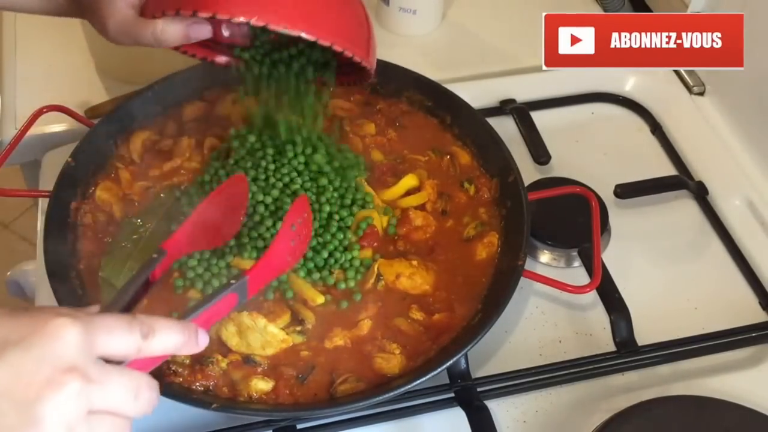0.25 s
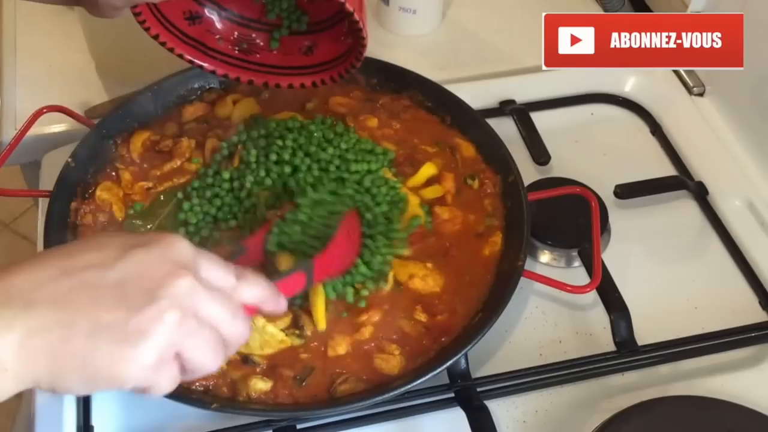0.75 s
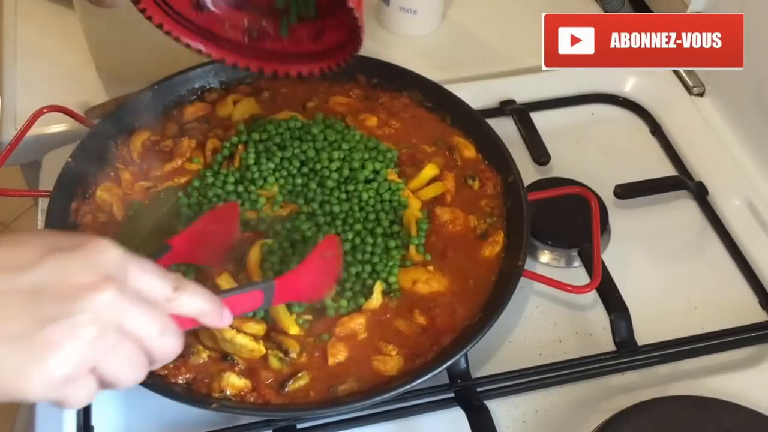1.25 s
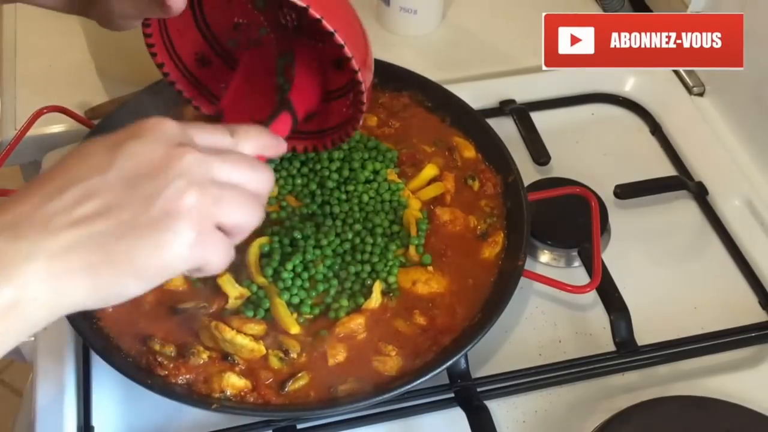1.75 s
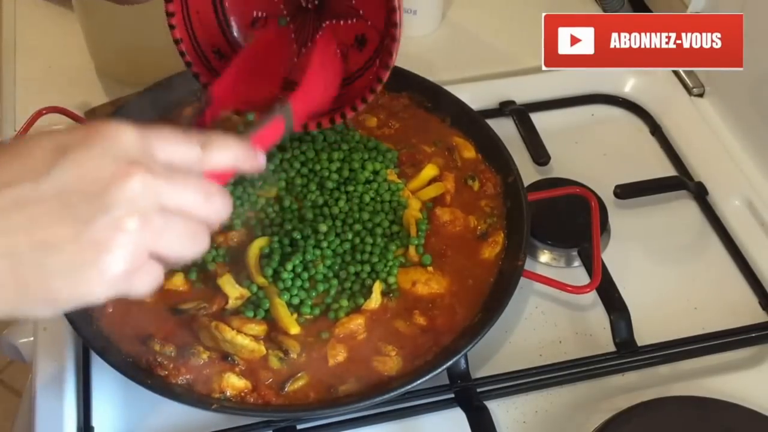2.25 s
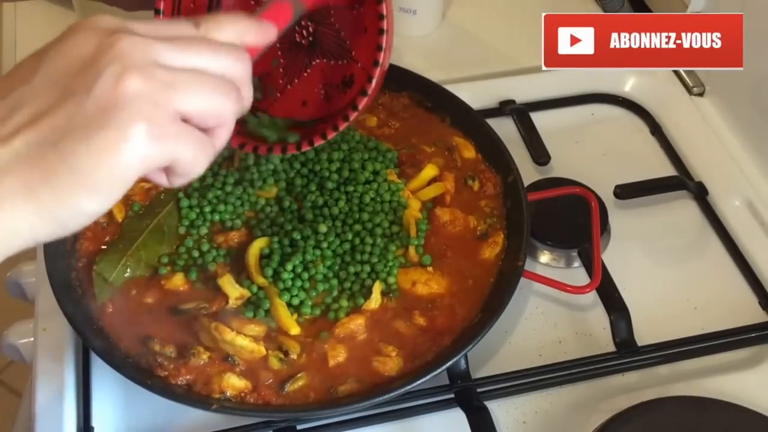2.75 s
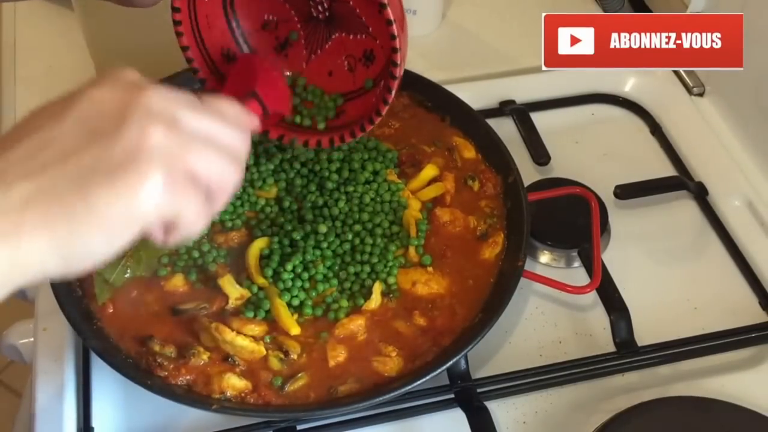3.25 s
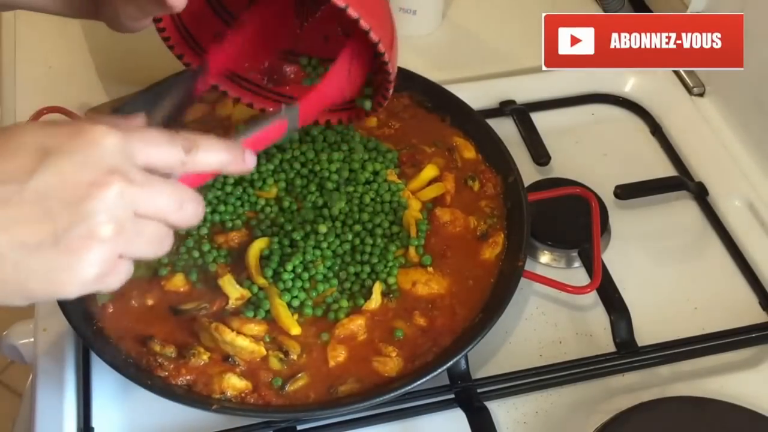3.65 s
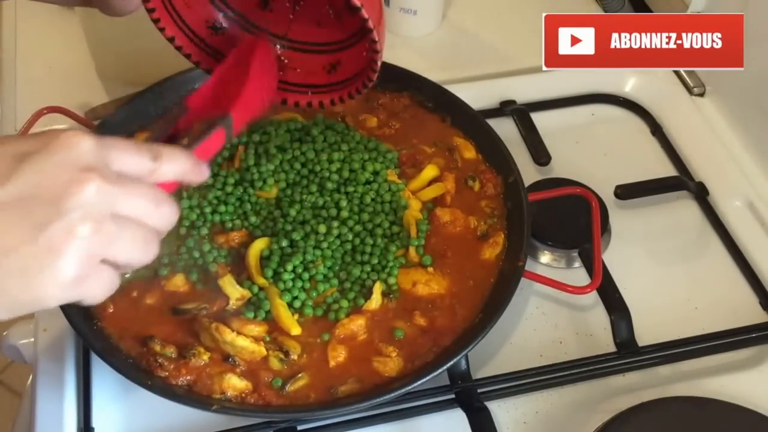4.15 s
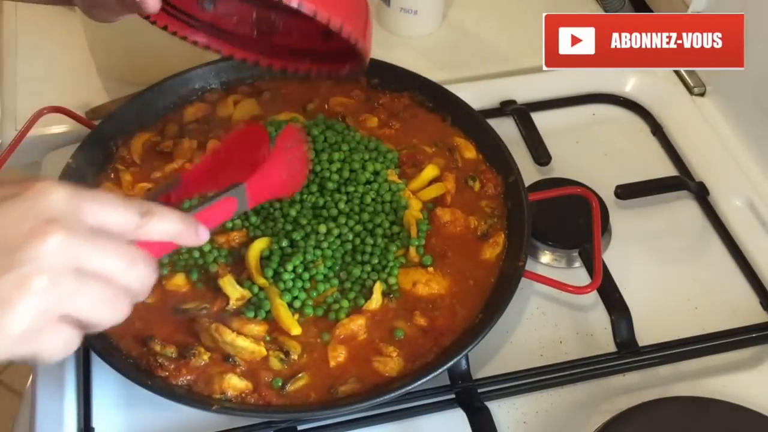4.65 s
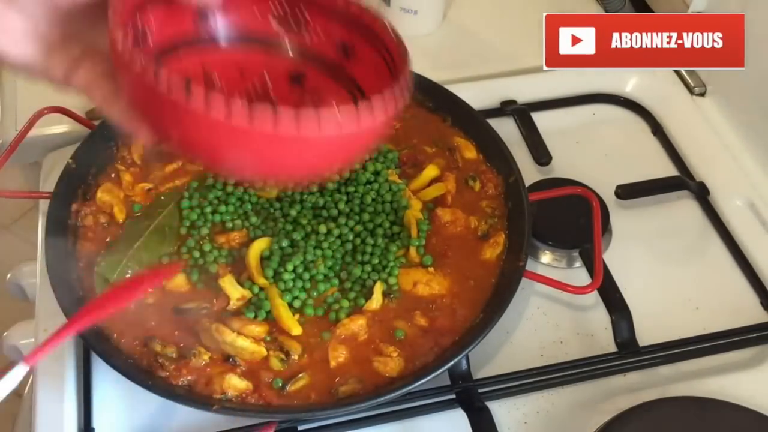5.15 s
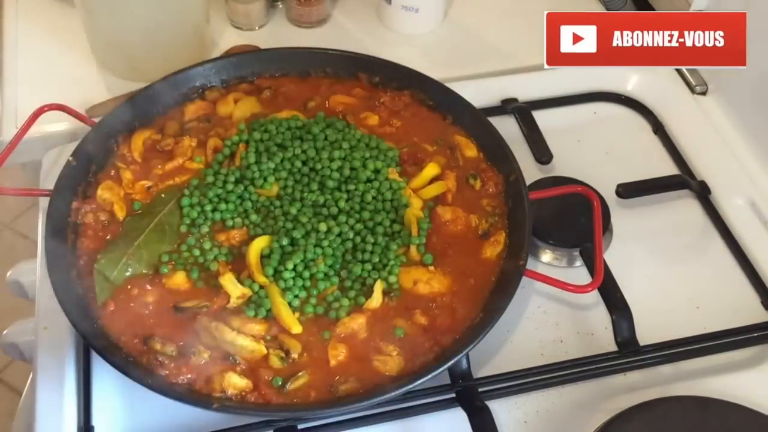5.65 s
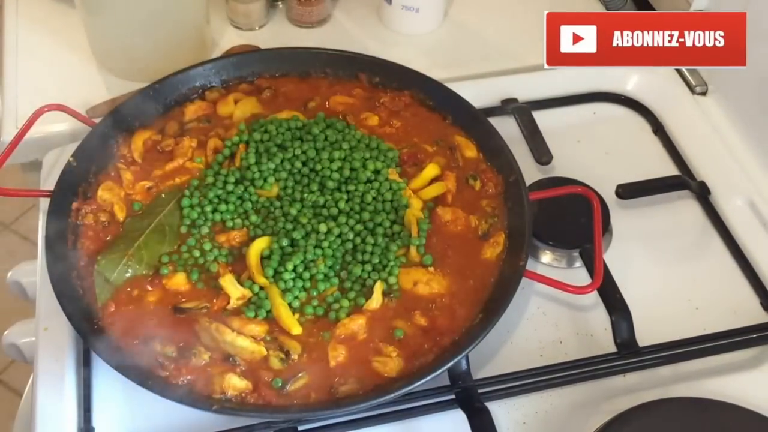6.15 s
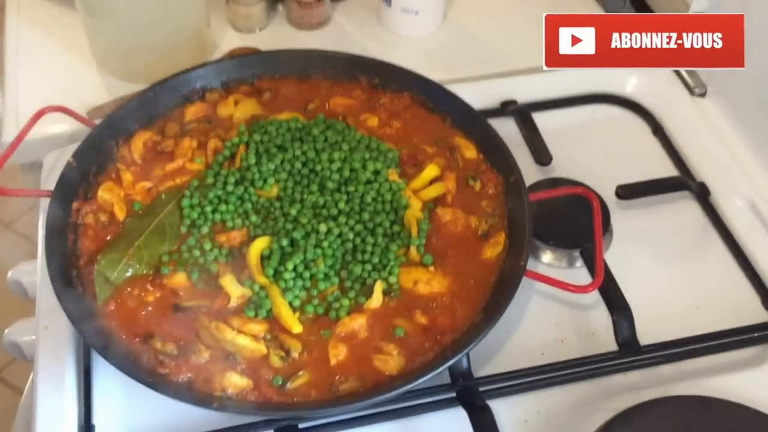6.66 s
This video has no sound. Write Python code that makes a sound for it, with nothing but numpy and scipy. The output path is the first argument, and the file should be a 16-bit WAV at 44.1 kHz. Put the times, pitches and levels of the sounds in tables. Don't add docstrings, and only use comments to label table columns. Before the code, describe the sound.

A steady low simmer, fine crackle, gas hiss and faint extractor hum lie beneath sharp bowl knocks. A first crack, a duller pair, soft thuds, then a cluster of loud short rings; afterwards only dry ticks and snaps of tongs scraping out peas. Finally the bowl is set down in two hollow, woody blows with small rattles. Close mono phone pickup, brief tiled-room reflections.

```python
import sys
import numpy as np
from scipy import signal
from scipy.fft import rfft, irfft
from scipy.io import wavfile
from scipy.ndimage import uniform_filter1d, map_coordinates

SR = 44100
rng = np.random.default_rng(int(sys.argv[2]) if len(sys.argv) > 2 else 0)


def invert_db(x):
    u = np.asarray(x, float) / 20
    return 10 ** u


def put_to_file(sound):
    columns = np.atleast_2d(sound).T
    safe = np.clip(columns, -1, 1)
    whole_steps = np.round(safe * 32767)
    wavfile.write(sys.argv[1], SR, whole_steps.astype(np.int16))


N = 305172

# start in seconds, crack, thump, body and ring levels in dB.
BLOWS = [
    (0.3364, 1.5, -16.5, -12.5, -16),
    (0.6653, -40, -19, -21.5, -19),
    (0.724, -7, -17, -6.5, -18),
    (1.411, -29, -20, -24, -18),
    (1.8247, -21, -22, -25, -10),
    (2.107, 2, -39, -16.5, -10.5),
    (2.345, 5, -8.5, -2, -3),
    (2.6986, -5, -18.5, -11, -13),
    (6.4365, -7, -34, -11, -8),
    (6.6323, -6, -16, -2, -12.5),
]
# frequency in Hz, level in dB, t60 in seconds.
TIPPING_RINGS = [
    [(518, -7.5, 0.2), (1164, -15, 0.22), (1417, -11, 0.24), (1525, -13, 0.18), (2180, -26, 0.13),
     (3180, -5, 0.16), (3560, -7, 0.15), (3670, -6, 0.15), (4484, -6, 0.18)],
    [(129, -0.5, 0.18), (320, 8, 0.12), (392, -3, 0.12), (800, 0.5, 0.083), (1400, -8, 0.06)],
    [(130.4, -4.5, 0.24), (178.5, -1, 0.27), (334.5, -11, 0.3), (744, -14, 0.18), (900, -16, 0.3),
     (1098, -0.5, 0.31), (1240, 1, 0.16), (1440, -6, 0.2), (1530, -5, 0.1), (1940, -13, 0.12)],
    [(147, 3.5, 0.17), (278, 2, 0.092), (336, 2, 0.1), (771, -2, 0.06), (1446, -14, 0.1)],
    [(187, -6, 0.24), (236, 0.5, 0.099), (528, -20, 0.09), (1175, -18.5, 0.067), (1490, -23, 0.12)],
]
SCRAPING_RINGS = [
    [(175.7, -14.5, 0.4), (279, -10, 0.34), (900, -10, 0.13), (1136, -12, 0.26), (1384, -8, 0.099),
     (1755, -8.5, 0.17), (2000, -14.5, 0.2), (2200, -13, 0.15)],
    [(175.6, -1.5, 0.23), (246, -7, 0.16), (328, -3, 0.11), (557, -14, 0.27), (622, -14, 0.092),
     (760, -8.5, 0.16), (1130, -7, 0.11), (1392, -6.5, 0.22), (1470, -13, 0.2), (1974, -5, 0.095),
     (2174, -17, 0.18)],
    [(277, -5, 0.091), (527, -14, 0.28), (599, -13, 0.11), (730, -1, 0.067), (926, -10, 0.14),
     (1130, -9.5, 0.2), (1392, -9.5, 0.14), (1720, -19, 0.13), (4300, -8, .03), (3080, -16, 0.053)],
]
WORKTOP_RINGS = [
    [(119, -28, 0.28), (149, 7, 0.12), (216.4, -1.5, 0.29), (321, 5, 0.12), (691, -9.5, 0.22),
     (839, 2.5, 0.09), (980, 1, 0.059), (1460, -26, 0.17), (1960, -13, 0.15), (2350, -19, 0.2),
     (3080, -13, 0.075)],
    [(249, 4, 0.24), (284, 0.5, 0.18), (613, -1.5, 0.41), (780, -6, 0.11), (950, -6, 0.24),
     (1200, -6, 0.27), (1497, -9, 0.19), (1670, -4, 0.19), (1970, -6, 0.15), (2667, -2.5, 0.067),
     (3320, -13, .07)],
]
BOWL_MODES_HZ = [2600, 2947, 3008, 3348, 3806, 4554, 4850, 5960, 6845, 7510, 8834, 9255, 10040, 11860]
BOWL_T60_S = [0.19, 0.27, 0.19, 0.098, 0.27, 0.17, 0.046, 0.17, 0.14, 0.085, 0.1, 0.14, 0.14, 0.1]
BOWL_WOKEN_DB = {0: [-27, -6.5, -4, -7, -19, -13, -15, -11, -22, -10, -30, -19, -29, -25], 2: [-18, -15.5,
                 -11, -30, -36, -32, -7.5, -26, -29, -14, -38, -32, -22, -42], 5: [-22, -15, -10, -24, -16,
                 -10.5, -9, -11, -16, -12, -11.5, -25, -28, -21], 6: [-12.5, -20, -10, -11.5, -14, -12.5,
                 -2.5, -19, -24, -23, -39, -29, -27, -26]}
# start in seconds, crack, thump and body levels in dB.
REBOUNDS = [(1.4535, -46, -26, -49), (1.4726, -45, -27, -33), (1.86, -40, -28, -28.5),
            (1.8903, -18, -42, -39), (2.3621, -14, -17, -8), (4.5055, -34, -55, -30.5),
            (5.1034, -12, -30, -27.5), (5.369, -40, -21.5, -30), (5.3844, -44, -40, -27),
            (5.4895, -36, -30.5, -26.5), (5.6432, -34, -33, -27.5), (6.2056, -44, -31, -33),
            (5.555, -48, -26, -44), (6.2306, -42, -35, -26.5), (6.262, -45, -35, -35),
            (6.4486, -12.5, -14, -6), (6.4948, -20, -12.5, -22), (6.654, -19, -8.5, -3.5),
            (6.685, -30, -10.5, -13), (6.734, -31, -15.5, -21)]
# frequency in Hz, level in dB per Hz.
CRACK_SPECTRUM = [(1060, -11), (1800, -9), (3020, -3.5), (4220, -7), (4720, -11), (5270, -7.5),
                  (14800, -33.5), (16500, -59)]
THUMP_SPECTRUM = [(30, -40), (70, -89), (120, -1.5), (320, -2), (520, -12), (900, -12)]
BODY_SPECTRUM = [(300, -74), (550, 3), (900, 1), (1500, -3), (2200, -9.5), (3500, -30)]
SNAP_SPECTRUM = [(500, -47), (1200, -5.5), (3000, 7), (7000, -2), (12000, -11), (15800, -15), (16700, -36)]
# frequency in Hz, t60 in seconds.
WALLS_T60_S = [(100, 0.22), (500, 0.32), (2000, 0.4), (6000, 0.29), (14000, 0.17)]

# start in seconds, peak in dB,
# frequency in Hz, t60 in seconds.
RAPS = [(0.3359, -1, 3390, 0.024), (0.3363, -1.5, 3000, 0.007), (.344, -16, 3450, .09),
        (.7245, -12, 1200, 0.03), (1.413, -9.5, 310, 0.049), (1.451, -11, 290, 0.04),
        (1.8242, -20, 221, 0.06), (0.3366, -5, 4580, 0.027), (.359, -19, 4580, .04), (.358, -22, 5850, .05),
        (.381, -14, 3000, 0.26), (1.4735, -19, 750, 0.027), (2.1077, -6.5, 4670, 0.035),
        (2.1075, -14, 3790, 0.064), (2.1085, -12.5, 6040, 0.05), (2.343, -2, 3000, 0.084),
        (2.6995, -6.5, 760, 0.032), (2.699, -11, 5550, .016), (2.708, -20, 1400, 0.036),
        (5.369, -23, 430, 0.049), (5.485, -26, 1470, .06), (5.643, -30, 2520, 0.036),
        (6.4366, -4, 1905, 0.022), (6.4372, -7.5, 2310, 0.021), (6.4916, -1, 190, 0.05),
        (6.446, -7, 927, 0.064), (6.579, -36, 6200, .015), (6.634, -7, 900, 0.04), (6.657, -3, 290, 0.09),
        (6.684, -6.5, 595, 0.037), (6.698, -14, 1700, .04),
        (.6665, -10, 330, .099), (2.9462, -19, 5600, 0.0044), (3.3106, -10.5, 5000, 0.0024),
          (3.589, -26, 2900, 0.014), (3.861, -27, 1800, .01), (4.024, -33, 6500, .008),
          (4.052, -41, 6040, .008), (4.1262, -10.5, 5980, 0.0038), (4.24, -32, 5500, .008),
          (4.2538, -12, 4000, 0.0038), (4.342, -33, 5000, .01), (4.366, -30, 6500, .008),
          (4.4752, -16, 4600, 0.0027), (4.476, -20, 1050, 0.018), (4.512, -22, 2400, .02),
          (5.644, -26, 800, 0.037), (6.446, -2, 168.7, 0.078), (6.532, -20, 800, 0.037),
          (6.712, -20, 302, 0.068), (6.726, -15, 610, 0.029), (6.748, -24, 1200, .03),
          (6.763, -18, 800, 0.038), (6.793, -28, 1800, .03)]
# start in seconds, peak in dB, frequency in Hz, t60 in seconds.
LINGERS = [(.345, -31, 4570, 0.56), (.41, -23.5, 2990, 0.25), (.728, -20.5, 1926, 0.25),
           (.728, -37, 7520, 0.18), (.745, -33, 4830, 0.15), (2.11, -31, 5950, 0.41),
           (2.176, -29.5, 4550, 0.21), (2.24, -39, 3780, .2), (2.11, -35, 7440, .3),
           (2.351, -32, 3807, 0.36), (2.4, -29, 3005, 0.3), (2.41, -38, 7500, 0.22)]
# start in seconds, peak in dB, t60 in seconds.
SPRAYS = [
    (.357, -29, .1),
    (2.712, -35, .15),
    (6.438, -21, 0.19),
    (6.633, -24.5, 0.3),
]
# frequency in Hz, level in dB per Hz.
SPRAY_SPECTRUM = [(1200, -30), (2000, 4), (4200, -2.5), (6000, -7), (9000, -22), (14000, -40)]

# start in seconds, peak in dB, frequency in Hz,
# t60 in seconds.
HOPS = [(.2215, -31, 2900, .015), (.683, -13, 330, .06), (.705, -17, 300, .04), (.713, -30, 3000, .03),
        (.737, -6.5, 1150, 0.017), (.762, -18, 1200, .03), (.784, -16, 1120, .03), (.868, -29, 3180, .03),
        (1.434, -14.5, 320, 0.073), (1.474, -28, 1290, 0.018), (1.492, -24, 304, .06),
        (1.524, -27, 220, .05), (1.838, -30, 1250, .03), (1.85, -18, 261, .07), (1.888, -24, 207, 0.066),
        (2.362, 1, 1366, .04), (2.386, -18, 990, .04), (2.415, -25, 700, 0.036), (4.047, -31, 715, .03),
        (5.1045, -26, 2390, 0.073), (5.115, -33, 2170, .08), (5.261, -35, 1340, .03),
        (5.58, -30, 1370, .03), (5.65, -32, 3000, .03), (6.504, -13, 268, .06), (6.66, -8, 620, .03),
        (6.7, -14, 330, .04), (2.109, -18, 6900, .04), (2.125, -17, 3000, .05), (2.13, -25, 6040, .06),
        (.337, -14, 3600, .03), (2.362, -10, 1800, .05), (5.374, -26, 800, .04), (6.47, -13, 800, .05),
        (2.705, -18, 1090, .04)]
# start in seconds, peak in dB, t60 in seconds.
PRICKS = [(.185, -34, .01), (4, -18, 0.0088), (3.7553, -29, .01), (4.1, -19, 0.0072), (4.4893, -25, 0.005),
          (4.2537, -21, .006), (3.6, -25, .006), (2.3435, -18.5, 0.043)]
# frequency in Hz, level in dB per Hz.
PRICK_SPECTRUM = [(1500, -30), (4000, -5), (9000, -1), (16000, 0), (17500, -30)]

# start in seconds, peak in dB, t60 in seconds.
SNAPS = [(1.222, -31, 0.031), (1.303, -27, 0.022), (2.506, -25.5, 0.026), (2.683, -29, 0.011),
         (2.945, -24.5, 0.027), (3.235, -29.5, 0.022), (3.252, -28, 0.031), (3.3109, -10, 0.0065),
         (3.562, -28, 0.015), (3.586, -19, 0.0088), (3.756, -39, .012), (3.7837, -17, 0.024),
         (4.0437, -32.5, 0.016), (4.169, -26, 0.027), (4.2536, -16, 0.016), (4.474, -15, 0.024),
         (4.4889, -10, 0.013), (4.676, -28.5, 0.012), (5.109, -26.5, 0.12)]
# start in seconds, peak in dB, frequency in Hz, t60 in seconds.
TAPS = [(0.256, -29.5, 6260, 0.022), (0.503, -22, 3580, 0.0095), (1.008, -32, 6230, .02),
        (1.522, -24, 3920, 0.016), (2.343, -6, 4800, 0.03), (2.805, -29, 4150, 0.011),
        (3.316, -15, 4400, 0.0079), (3.595, -24, 1200, 0.015), (3.766, -26, 4060, 0.016),
        (4.049, -27, 980, 0.028), (4.094, -32, 4100, 0.014), (4.126, -18, 6540, 0.0099),
        (6.272, -30, 3480, .013)]
# start in seconds, peak in dB, frequency in Hz, t60 in seconds.
POPS = [
    (1.22, -36, 8300, .02),
    (2.333, -24, 497, 0.043),
    (2.5868, -24, 5700, 0.02),
    (2.61, -25, 1800, 0.016),
    (4.382, -25, 1320, 0.025),
    (5.645, -35, 800, 0.036),
    (5.835, -27.5, 2000, 0.018),
    (6.205, -29.5, 115, 0.24),
    (6.427, -25, 870, .053),
    (6.626, -30, 900, .04),
]

# time in seconds, level in dB.
SIMMER_DB = [(0, -40), (.3, -43), (.62, -42.5), (.85, -37), (1.12, -42), (1.5, -40.5), (1.62, -47),
             (2.0, -45), (2.6, -42.5), (3.6, -43), (4.4, -42.5), (5.2, -42.5), (5.63, -40.5), (5.85, -42.5),
             (6.1, -40.5), (6.36, -43), (6.92, -44)]
# time in seconds, peak in dB, swell in seconds.
STEAM = [
    (1.02, -41, 0.14),
    (1.3, -43, 0.087),
    (4.47, -59, 0.055),
    (5.35, -46.5, 0.36),
    (5.8, -44, 0.13),
]
# time in seconds, peak in dB, swell in seconds.
FLARES = [(.38, -58, 0.048), (2.12, -61, 0.044), (4.24, -61.5, 0.13), (5.4, -61, 0.069), (5.63, -62, .08),
          (6.19, -53.5, 0.033)]
# time in seconds, peak in dB, swell in seconds.
SHAKES = [(.39, -40, 0.037), (.72, -54, 0.22), (1.5, -55, 0.18), (1.87, -62, .04), (2.4, -44, 0.056),
          (2.72, -65, .03), (3.05, -58, 0.25), (3.93, -66, 0.18), (4.33, -60, 0.065), (4.8, -62, 0.13),
          (5.2, -52, .03), (5.39, -41, 0.027), (5.66, -41, 0.11), (5.97, -60, .025), (6.07, -47, 0.033),
          (6.26, -38, 0.028), (6.47, -38, 0.035), (6.69, -37, 0.038), (6.79, -41, .04)]
# frequency in Hz, level in dB per Hz.
RUMBLE_SPECTRUM = [(15, -40), (30, -22), (54, -10.5), (150, -10.5), (200, -14), (260, -22), (440, -120)]
PAN_SPECTRUM = [(59, -69), (100, -13.5), (250, -5), (600, -8), (720, -4), (1360, -9.5), (2500, -25),
                (5500, -120)]
SIZZLE_SPECTRUM = [(1060, 1), (1800, 0), (3980, 0.5), (4880, -5.5), (5290, -2.5), (8500, -10.5),
                   (11700, -21), (19800, -120)]
FLAME_SPECTRUM = [(7000, -59), (8500, 0), (11000, -4.5), (13000, 4), (14200, -3), (15750, -6), (15900, -30),
                  (16600, -45)]
# frequency in Hz, width in Hz, level in dB.
BURNER_WHISTLES = [(4000, 340, -55.5), (9016, 130, -59.5), (10000, 400, -66), (12900, 250, -69),
                   (13350, 150, -57.5)]
# frequency in Hz, width in Hz, level in dB.
EXTRACTOR_HUM = [(181.7, 12, -49), (210.2, 6, -55.5)]


def unit(x):
    return x / np.sqrt(np.mean(x ** 2) + 1e-20)


def along(points, hz):
    f, v = np.transpose(points)
    return np.interp(np.log(hz + 1), np.log(f + 1), v)


def coloured(x, gain):
    spectrum = rfft(x) * gain(np.fft.rfftfreq(x.shape[-1], 1 / SR))
    return unit(irfft(spectrum, x.shape[-1]))


def shaped(points):
    return lambda hz: invert_db(along(points, hz)) * (hz > points[0][0]) * (hz < points[-1][0])


def peak(centre_hz, width_hz):
    return lambda hz: 1 / (1 + (2 * (hz - centre_hz) / width_hz) ** 2)


def decay(t, db, t60_s, rise_s):
    return invert_db(db - 60 * t / t60_s) * (1 - np.exp(-t / rise_s))


def add(track, s, sound, wet_db):
    hz, t, z = signal.stft(rng.standard_normal(SR // 2)[:SR // 3], SR, nperseg=256)
    wall_decay = invert_db(-60 * t / along(WALLS_T60_S, hz)[:, None])
    tail = signal.istft(z * wall_decay, SR, nperseg=256)[1]
    delayed = np.pad(sound, (130, 0))
    heard = invert_db(wet_db) * signal.fftconvolve(delayed, tail / np.linalg.norm(tail))
    heard[:len(sound)] += sound
    spot = track[round(s * SR):][:len(heard)]
    spot += heard[:len(spot)]


def knocks():
    track, t = np.zeros(N), np.arange(SR // 2) / SR
    rings = TIPPING_RINGS + SCRAPING_RINGS + WORKTOP_RINGS
    for k, ((s, *noise_db, ring_db), modes) in enumerate(zip(BLOWS, rings)):
        dull = ringing(t, *np.transpose(modes), blur=1.39, flutter_hz=230.7)
        add(track, s, contact(*noise_db) + invert_db(ring_db - 5.5) * dull, wet_db=-5.5)
        if k in BOWL_WOKEN_DB:
            clear = ringing(t, BOWL_MODES_HZ, BOWL_WOKEN_DB[k], BOWL_T60_S, blur=1.0, flutter_hz=81.0)
            add(track, s, invert_db(ring_db - 2.5) * clear, wet_db=-11.5)
    for s, *noise_db in REBOUNDS:
        add(track, s, contact(*noise_db), wet_db=-0.5)
    return track


def contact(crack_db, thump_db, body_db):
    t = np.arange(SR // 2) / SR
    noise = rng.standard_normal((4, len(t)))
    rattle_s = 0.055
    click = invert_db(crack_db - 18.5 - 60 * t / 0.015) * coloured(noise[3], shaped(SNAP_SPECTRUM))
    crack = invert_db(crack_db - 13.5 - 60 * t / (0.42 * rattle_s)) * coloured(noise[0], shaped(CRACK_SPECTRUM))
    body = decay(t, body_db - 5.5, rattle_s, 0.00059) * coloured(noise[1], shaped(BODY_SPECTRUM))
    thump = decay(t, thump_db - 6.5, 2.53 * rattle_s, 0.0052) * coloured(noise[2], shaped(THUMP_SPECTRUM))
    return click + crack + body + thump


def ringing(t, hz, db, t60_s, blur, flutter_hz):
    knots = rng.standard_normal((2, 20, 200))[:, :len(hz)]
    at_s = np.arange(200) / flutter_hz
    flutter = np.array([np.interp(t, at_s, a) + 1j * np.interp(t, at_s, b) for a, b in zip(*knots)])
    hz, db, t60_s = np.array([hz, db, t60_s])[:, :, None]
    envelope = decay(t, db, t60_s, 1 / hz)
    depth = blur * np.minimum(hz / 700, 1) * (1 - np.exp(-t / 0.0071))
    start_phase = 3 * knots[0][:, -1:]
    carrier = np.exp(1j * (2 * np.pi * hz * t + start_phase))
    return (envelope * (1 + depth * flutter) * carrier).real.sum(0)


def raps():
    track, dry, t = np.zeros(N), np.zeros(N + SR), np.arange(SR // 3) / SR
    for s, db, t60_s in SPRAYS:
        noise = coloured(rng.standard_normal(len(t)), shaped(SPRAY_SPECTRUM))
        add(track, s, invert_db(db - 60 * t / t60_s) * noise, wet_db=-10.0)
    rows = [(*row, 0.84) for row in RAPS] + [(*row, 0.6) for row in LINGERS]
    for s, db, hz, t60_s, tone in rows:
        t = np.arange(SR // 3 if t60_s > 0.1 else 4096) / SR
        width_hz = 0.15 * hz * min(1, 0.02 / t60_s)
        noise = coloured(rng.standard_normal(len(t)), peak(hz, width_hz))
        rap = tone * np.sin(2 * np.pi * hz * t) + (1 - tone) * noise
        dry[round(s * SR):][:len(t)] += decay(t, db, t60_s, 0.024 * t60_s) * rap
    add(track, 0, dry[:N], wet_db=-13)
    return track


def hops():
    track, dry, t = np.zeros(N), np.zeros(N + SR), np.arange(4096) / SR
    for s, db, t60_s in PRICKS:
        noise = coloured(rng.standard_normal(len(t)), shaped(PRICK_SPECTRUM))
        dry[round(s * SR):][:len(t)] += invert_db(db - 7.5 - 60 * t / t60_s) * noise
    tone = 0.51
    for s, db, hz, t60_s in HOPS:
        rattle = coloured(rng.standard_normal(len(t)), peak(hz, 0.39 * hz))
        hop = tone * 1.2 * np.sin(2 * np.pi * hz * t) + (1 - tone) * rattle
        dry[round(s * SR):][:len(t)] += decay(t, db, t60_s, 0.041 * t60_s) * hop
    add(track, 0, dry[:N], wet_db=-11.5)
    return track


def ticks():
    track, t = np.zeros(N), np.arange(2048) / SR
    rows = [(s, db, 4200, t60_s, 0.061) for s, db, t60_s in SNAPS]
    rows += [(*row, 0.52) for row in TAPS]
    rows += [(*row, 0.72) for row in POPS]
    for s, db, hz, t60_s, tone in rows:
        noise = coloured(rng.standard_normal(len(t)), shaped(SNAP_SPECTRUM))
        tick = (1 - tone) * noise + 1.86 * tone * np.sin(2 * np.pi * hz * t)
        add(track, s, decay(t, db + 0.5, t60_s, 0.046 * t60_s) * tick, wet_db=-7.5 - 1.8 * tone)
    return track


def wobble(rate_hz):
    knots = rng.standard_normal(int(N * rate_hz / SR) + 4)
    return map_coordinates(knots, [np.arange(N) * rate_hz / SR])


def patchy(depth_db):
    z = signal.stft(rng.standard_normal(N + 512), nperseg=512)[2]
    field = uniform_filter1d(rng.standard_normal(z.shape), 6, 0)
    field = uniform_filter1d(field, 10, 1)
    return signal.istft(z * invert_db(depth_db * unit(field)), nperseg=512)[1][:N]


def crackle(per_s, spread_db):
    draw = rng.random((2, N))
    size = invert_db(-spread_db * np.log(draw[1] + 0.03))
    return unit((draw[0] < per_s / SR) * size * np.sign(rng.standard_normal(N)))


def swells(rows, under_db):
    t = np.arange(N) / SR
    bells = sum(invert_db(2 * db) * np.exp(-((t - s) / swell_s) ** 2) for s, db, swell_s in rows)
    return np.sqrt(invert_db(2 * under_db) + bells)


def stove():
    simmer_db = np.interp(np.arange(N) / SR, *np.transpose(SIMMER_DB))
    sizzle_db = -47 + 0.49 * (simmer_db + 43)
    lag_s, swell_s = 0.047, 0.044
    jumps = [(s + lag_s, body_db - 29, swell_s) for s, _, _, body_db, _ in BLOWS]
    spits = [(s + lag_s, body_db - 47, swell_s) for s, _, _, body_db, _ in BLOWS]

    rumble = coloured(patchy(0.57), shaped(RUMBLE_SPECTRUM))
    out = swells(SHAKES, -73) * invert_db(1.4 * wobble(11)) * rumble
    pan = coloured(patchy(1.9) + 0.34 * crackle(150, 2.0), shaped(PAN_SPECTRUM))
    out += swells(jumps, simmer_db) * invert_db(0.51 * wobble(12)) * pan
    sizzle = coloured(patchy(3.7) + 0.5 * crackle(160, 1.7), shaped(SIZZLE_SPECTRUM))
    out += swells(STEAM + spits, sizzle_db) * invert_db(1.85 * wobble(13)) * sizzle
    flame = coloured(patchy(2.8) + 0.47 * crackle(60, 3.5), shaped(FLAME_SPECTRUM))
    out += swells(FLARES, -64) * invert_db(7.0 + 1.1 * wobble(2.94)) * flame
    for hz, width_hz, db in BURNER_WHISTLES + EXTRACTOR_HUM:
        out += invert_db(db + 0.2 * wobble(3.06)) * coloured(rng.standard_normal(N), peak(hz, width_hz))
    return out


def scene():
    return (knocks() + raps() + hops() + ticks() + stove())[None]


def roll_off(x):
    return signal.sosfilt(signal.butter(12, 16640, fs=SR, output="sos"), x)


def record(dry):
    limited = dry / (1 + np.abs(dry) ** 12) ** (1 / 12)
    hz, _, z = signal.stft(limited, SR, nperseg=1024)
    high = hz > 13750
    power = uniform_filter1d(np.abs(z[:, high]) ** 2, size=5, axis=1)
    power = uniform_filter1d(power, size=2, axis=2)
    z[:, high] *= power > 1.05 * np.median(power[:, :40])
    z[:, hz > 16700] = 0
    mix = signal.istft(z, SR, nperseg=1024)[1][:, :N]
    return roll_off(mix)


dry = scene()
out = record(dry)
put_to_file(out)
```